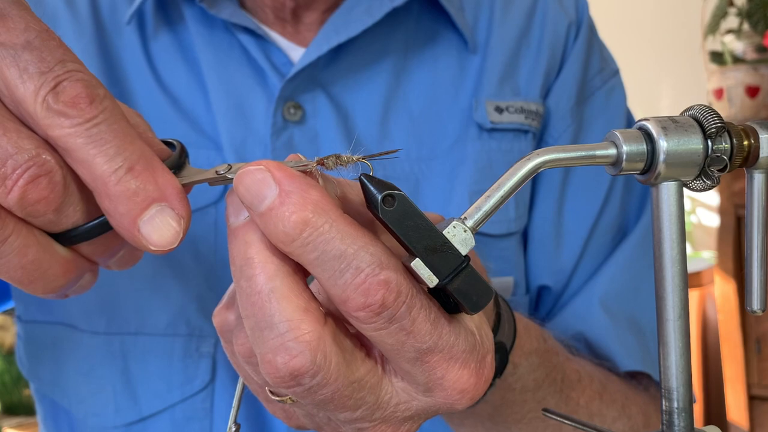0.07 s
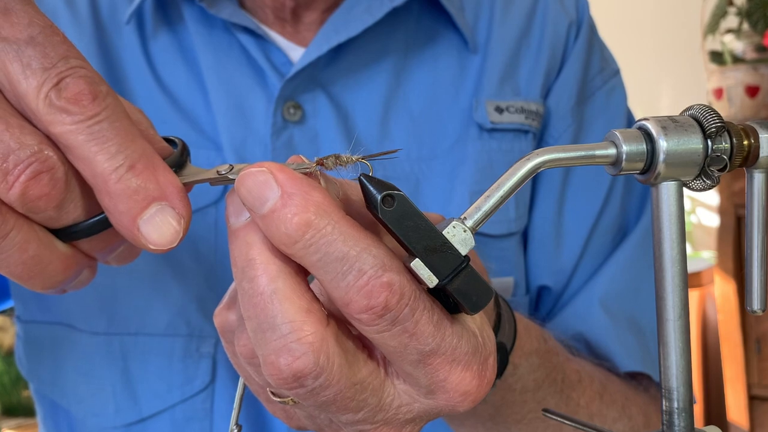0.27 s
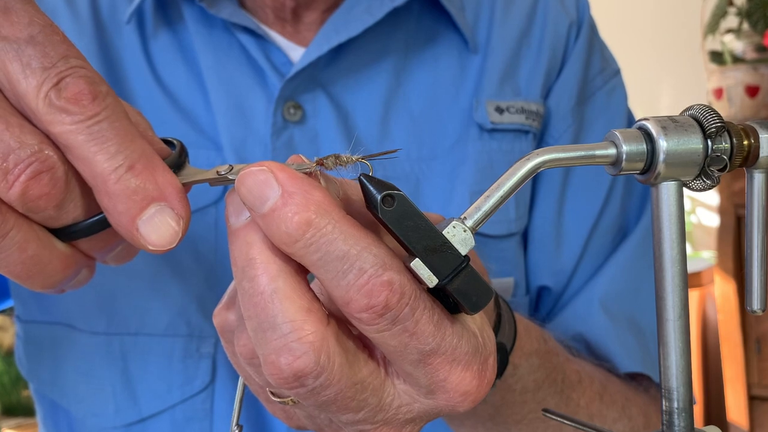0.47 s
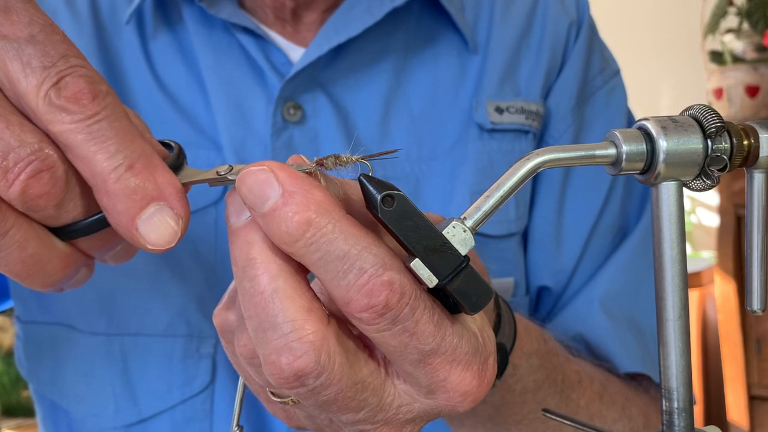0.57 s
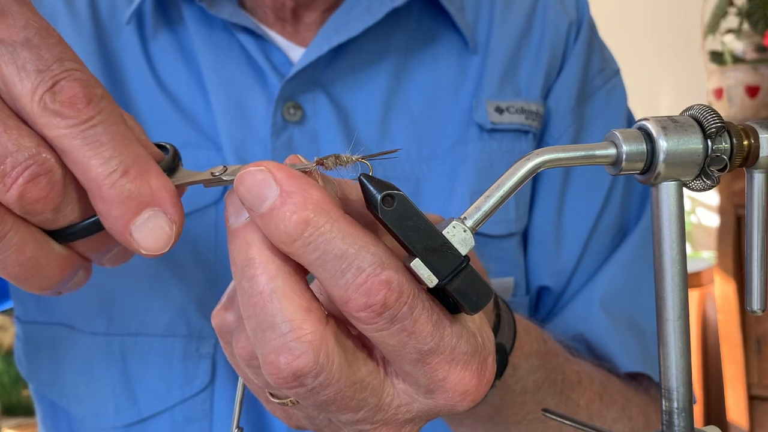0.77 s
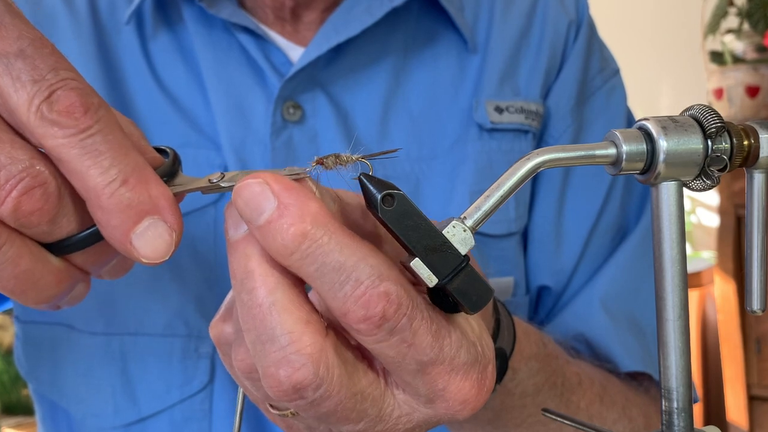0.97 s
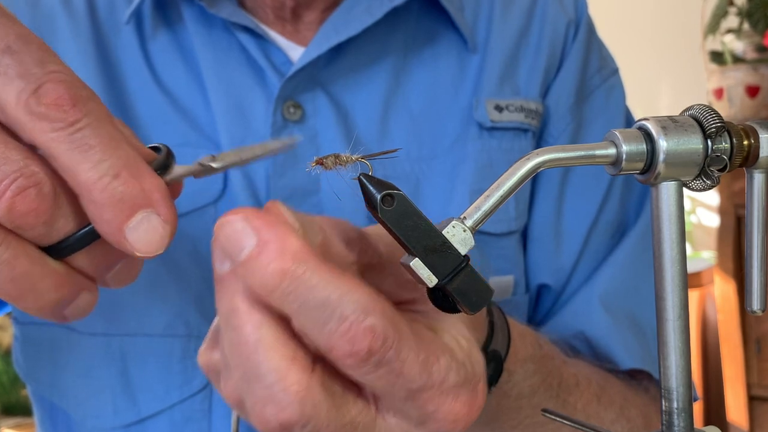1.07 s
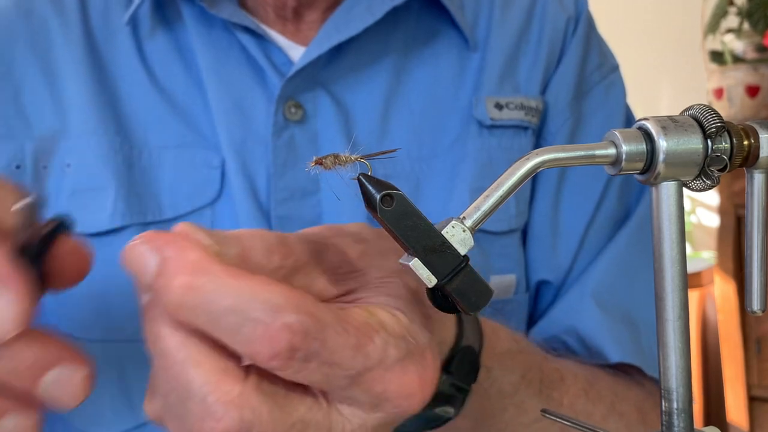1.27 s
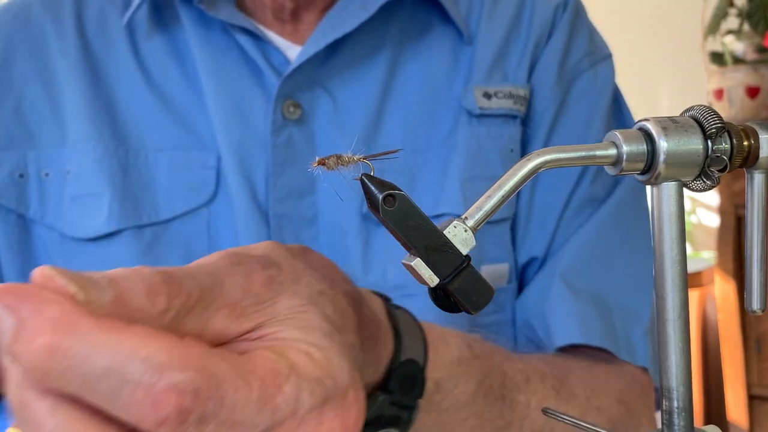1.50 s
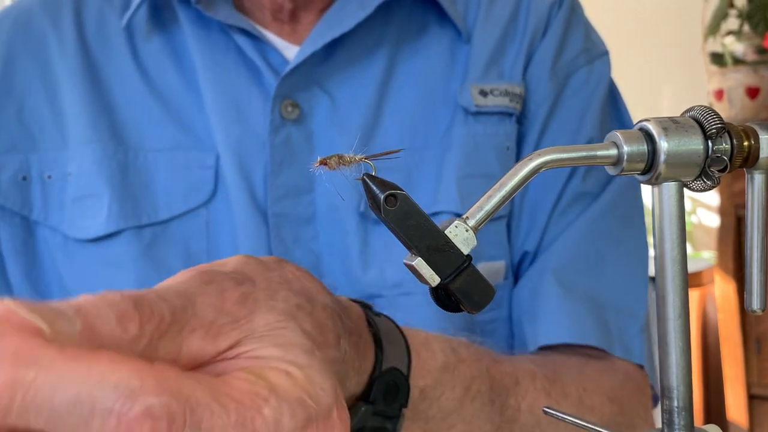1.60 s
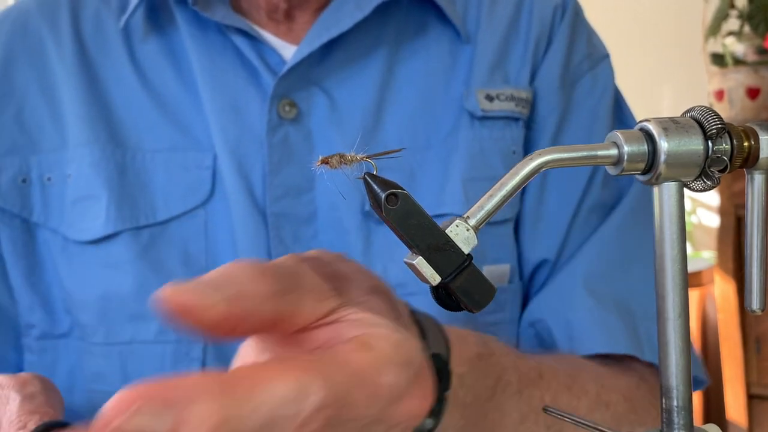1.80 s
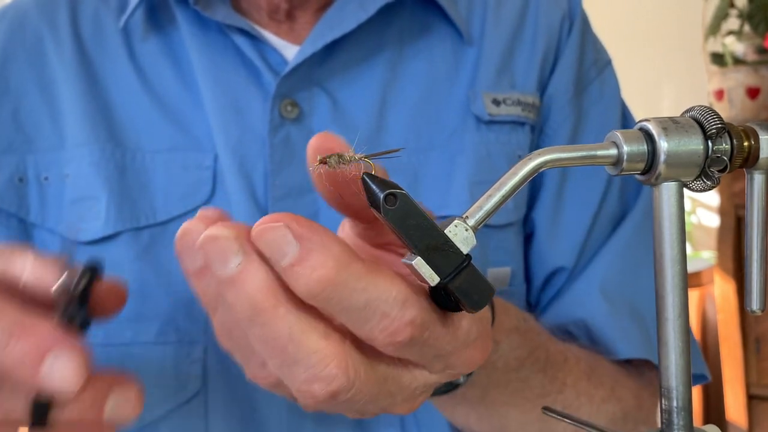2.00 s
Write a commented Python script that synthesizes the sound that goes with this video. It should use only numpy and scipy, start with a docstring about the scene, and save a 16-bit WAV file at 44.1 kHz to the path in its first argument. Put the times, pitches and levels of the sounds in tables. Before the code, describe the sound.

A close scissor snip, a sleeve rustle, then steel scissors knocking onto a wooden desk.

```python
"""Over a low hum, small steel scissors snip a thread close by, then tick once as the blades open.
A sleeve rustles, a hand rubs on cloth and the scissors are put down on a wooden desk: three knocks
with a short slide, each a click of ringing steel over a hollow thump of wood. The loose blades chatter
after the hardest knock. The small room adds a short echo, and holds the electrical hum, a rumble,
two tiny squeaks and a faint swish that repeats."""
import sys
import numpy as np
from scipy import signal
from scipy.fft import rfft, irfft
from scipy.io import wavfile
from scipy.ndimage import uniform_filter1d

SR = 44100
rng = np.random.default_rng(int(sys.argv[2]) if len(sys.argv) > 2 else 0)


def materialize(psi):
    """Save the field psi as 16-bit PCM at rate SR to the path in sys.argv[1].

    A 1-D psi becomes a single channel; in a 2-D psi each row is a channel.
    """
    bounded = np.clip(np.atleast_2d(psi).T, -1, 1)
    quanta = np.round(bounded * 32767).astype(np.int16)
    wavfile.write(sys.argv[1], SR, quanta)


N = 90316
T = np.arange(N) / SR

# Blade clicks: t/s, level/dB, time to fade by 60 dB (t60)/s, tilt toward treble/dB per octave
BLADE_CLICKS = [(.6022, -40.5, 0.0096, -8), (0.6307, -13.5, 0.0099, -1), (0.635, -22.5, 0.013, -2.5),
                (0.7797, -34, 0.017, -6), (.7822, -39, 0.016, -5)]
# Tone of a click, or how strong each pitch is: f/Hz, level/dB
CLICK_TONE = [(400, -45), (1200, -29.5), (2200, -4.5), (4500, -8.5), (8000, -9.5), (10500, -2), (12200, 3),
              (14200, 7), (15500, 5.5), (16500, -30)]
def snips():
    """The blades bite through the thread, click shut and tick open: tiny bursts of noise."""
    out = 0
    for at, db, t60, tilt_db in BLADE_CLICKS:
        burst = rng.standard_normal(N) * fade(t60) * rise(.0002)
        click = colour(burst, CLICK_TONE, tilt_db)
        out = out + amp(db) * place(unit(click), at, lag_ms=.18)
    return out

# Rasps of the edges: t/s, level/dB, t60/s, tilt/dB per octave
EDGE_RASPS = [(.638, -23.5, 0.14, 0), (0.786, -45.5, .17, -1.5)]
# Tone of a rasp: f/Hz, level/dB
RASP_TONE = [(600, -25), (1300, -5.5), (2100, 4.5), (3200, 0), (5500, 0), (8500, -14), (10500, 0.5),
             (13200, -2), (14500, 8.5), (15400, 5), (16200, -28)]
def rasps():
    """The edges rasp on for a moment after closing and opening."""
    return sum(rattle(at, db, t60, RASP_TONE, tilt_db) for at, db, t60, tilt_db in EDGE_RASPS)

# Knocks on the desk: t/s, steel level/dB, boosted f/Hz, boost/dB, crack level/dB,
# crack tilt/dB per octave, tip level/dB, thump level/dB, thump f/Hz, left ear delay/ms
DESK_KNOCKS = [(1.6140, -19.5, 7090, 11.5, -9.5, -0.8, -42, -9, 578, .2),
               (1.7273, 2, 7470, 2.5, -3.5, 4.5, -21.5, -1, 266, .18),
               (1.8237, -15, 10950, 14.5, -5, -1, -55, -9.5, 283, .21)]
# Tone of the sharp crack: f/Hz, level/dB
CRACK_TONE = [(300, -16.5), (900, -8), (1600, -9), (2500, 5.5), (3800, 3.5), (5300, -9), (7200, -1),
              (8500, -13), (10200, 1), (11800, -3), (13300, -8), (14800, -1), (17000, -17)]
# Notes of the closed scissors, cut short by the desk: f/Hz, level/dB, t60/s
STEEL_NOTES = [(2364, -14.5, 0.028), (3515, -6.5, .011), (4003, -6, .009), (4200, -1.5, 0.0081),
               (4840, -0.5, 0.011), (7140, -2, .008), (7740, 2.5, 0.0097), (9500, -2, 0.0026),
               (10600, 2, 0.0076), (11660, 2.5, 0.006), (14500, -0.5, 0.007)]
# Longer notes of the free blade tips: f/Hz, level/dB, t60/s
TIP_NOTES = [(2380, -14.5, .3), (4720, -12, .25), (4830, -4, 0.3), (4980, -4.5, 0.3), (5230, -5.5, 0.35),
             (5340, -7.5, .3), (5900, -8.5, .12)]
def knocks():
    """Each knock cracks, rings the steel a little differently and thumps the desk: (metal, wood)."""
    metal, wood = 0, 0
    for knock in DESK_KNOCKS:
        at, steel_db, boost_hz, boost_db, crack_db, tilt_db, tip_db, thump_db, thump_hz, lag_ms = knock
        boost = lambda hz: amp(boost_db * near(hz, boost_hz, octaves=.19))
        burst = rng.standard_normal(N) * fade(.007) * rise(.0002)
        crack = shape(colour(burst, CRACK_TONE, tilt_db), boost)
        notes = [(hz * (1 + .003 * rng.standard_normal()), db, t60) for hz, db, t60 in STEEL_NOTES]
        steel = ring(notes, boost) * rise(.00087)
        tips = ring(TIP_NOTES)
        hit = amp(steel_db) * unit(steel) + amp(crack_db) * unit(crack) + amp(tip_db) * unit(tips)
        metal = metal + place(hit, at, lag_ms)
        wood = wood + thump(at + .001, thump_db, thump_hz, rise_s=.0054)
    return metal, wood

# Notes of the desk top: f/Hz, level/dB, t60/s
DESK_NOTES = [(105.83, -16, 0.46), (180.36, -21, 0.44), (226.5, -9, 0.054), (259.4, 0, 0.034),
              (317, 3, 0.029), (371, -5.5, 0.028), (558.5, -1.5, 0.022), (802, -6, 0.027),
              (1100, -7.5, 0.023), (1730, -19.5, 0.46)]
def thump(at, db, centre_hz, rise_s):
    """A push makes the desk top ring, favouring its notes near centre_hz."""
    body = ring(DESK_NOTES, lambda hz: near(hz, centre_hz, octaves=.94)) * rise(rise_s)
    left_right_db = np.array([[1], [-1]])
    return amp(db + left_right_db) * place(unit(body), at, lag_ms=-.21)

# The one burst of chatter: t/s, level/dB, t60/s
BLADE_CHATTER = (1.735, -12, .25)
# Its tone: f/Hz, level/dB
CHATTER_TONE = [(1800, -27), (2500, -4.5), (3300, -25), (4500, 1), (5200, 7.5), (5900, 4.5), (6700, -5.5),
                (8000, -14), (9000, -21.5), (10200, 0.5), (11200, 3), (12300, -3), (13500, -18.5),
                (15000, -13), (16300, -36)]
def chatter():
    """The loose blades chatter after the hardest knock."""
    return rattle(*BLADE_CHATTER, CHATTER_TONE, tilt_db=-2.5)

def rattle(at, db, t60, tone, tilt_db):
    """A dying run of tiny steel taps, made from grainy noise."""
    hiss = colour(rng.standard_normal((2, N)), tone, tilt_db)
    run = hiss * fade(t60) * rise(.0019) * amp(-.5 * walk(760))
    delayed = np.pad(unit(run), ((0, 0), (int(at * SR), 0)))[:, :N]
    return amp(db) * np.sqrt(2) * delayed

# Short scrapes: t/s, level/dB, half length/s
SCRAPES = [(1.634, -41.5, 0.014), (1.676, -42.5, 0.01), (1.723, -48, 0.0034), (1.74, -49, 0.024),
           (1.842, -46, .03)]
# Tone of steel on wood: f/Hz, level/dB
SCRAPE_TONE = [(100, 12.5), (350, 16.5), (700, -2), (1500, -10), (3500, -8), (6500, -9.5), (9000, -22.5),
               (15000, -22), (16300, -38.5)]
def slides():
    """The scissors scrape unevenly over the wood as they settle."""
    push = sum(amp(db) * swell(at, half) for at, db, half in SCRAPES)
    return spread(noise(SCRAPE_TONE)) * push * amp(2 * walk(300))

# Bumps of the arm: t/s, level/dB, centre f/Hz
ARM_BUMPS = [(1.184, -23.5, 303), (1.272, -22.5, 150), (1.412, -22.5, 245.5), (1.665, -15.5, 150.8)]
def bumps():
    """The arm bumps the desk softly, so each thump starts gently."""
    return sum(thump(at, db, hz, rise_s=.017) for at, db, hz in ARM_BUMPS)

# How loud the sleeve is: t/s, level/dB
SLEEVE_LEVEL = [(0, -90), (1.08, -80), (1.2, -65), (1.33, -62.5), (1.45, -55), (1.56, -62), (1.85, -62),
                (2.05, -74)]
# Tone of the cloth: f/Hz, level/dB
CLOTH_TONE = [(100, 18.5), (220, 27.5), (500, 14), (900, 5.5), (1600, -9), (2300, -5), (4500, -7),
              (8000, -28), (11000, -19), (16000, -22.5)]
def sleeve():
    """The sleeve rustles as the hands move."""
    return spread(noise(CLOTH_TONE) * amp(curve(SLEEVE_LEVEL) + .69 * walk(40)))

# How loud the hand rubs as it is lowered: t/s, level/dB
RUB_LEVEL = [(0, -99), (1.05, -87), (1.28, -77.5), (1.45, -72.5), (1.6, -75), (1.85, -81), (2.05, -87)]
# Hollow part of the rub: f/Hz, level/dB
RUB_TONE = [(500, -22), (1000, 3.5), (1350, -4.5), (1720, -1), (1950, -16), (3000, -25.5), (16000, -51.5)]
# Hissy part of the rub: f/Hz, level/dB
RUB_HISS_TONE = [(2000, -10), (4000, -8), (7200, 0.5), (8600, -13.5), (10000, 5), (12200, -0.5),
                 (13500, -9), (15000, -0.5), (16300, -17.5)]
def rub():
    """Skin drags over cloth in small catches, with a smooth, fine hiss on top."""
    catches = noise(RUB_TONE) * amp(walk(70))
    hiss = amp(-3.5) * noise(RUB_HISS_TONE)
    return spread(catches + hiss) * amp(curve(RUB_LEVEL))

# Tone of the echo: f/Hz, level/dB
ECHO_TONE = [(80, -1), (200, 3), (500, -9.5), (1100, -4.5), (1800, -11.5), (2500, -9), (5000, -16),
             (8000, -19), (11000, -14.5), (15000, -12), (16300, -24)]
def room(x):
    """The small room sends sound back from all sides; the treble dies first."""
    wash = rng.standard_normal((2, N))
    low = shape(wash, lambda f: 1 / (1 + (f / 7000) ** 2))
    tail = (low * fade(t60=.32) + (wash - low) * fade(t60=.13)) * rise(.0073) ** 2
    response = colour(spread(unit(tail)), ECHO_TONE)
    return signal.fftconvolve(x, response, axes=1)[:, :N]

# Faint squeaks: t/s, level/dB, f/Hz
TINY_SQUEAKS = [(.347, -74.5, 1850), (0.919, -72, 1860)]
def squeaks():
    """Two short tones, roughened by a shaky pitch."""
    shaky_time = np.cumsum(1 + .05 * walk(200)) / SR
    return sum(amp(db) * swell(at, half_s=.0099) * np.sin(2 * np.pi * hz * shaky_time)
               for at, db, hz in TINY_SQUEAKS)

# Tone of the swish: f/Hz, level/dB
SWISH_TONE = [(600, -25), (1200, 9.5), (1600, -4), (3000, -12.5), (5200, -2.5), (8000, -15), (15000, -17.5)]
def swish():
    """Four faint, evenly spaced puffs of noise."""
    first_s, gap_s = .15, .435
    puffs = sum(swell(first_s + k * gap_s, half_s=.026) for k in range(4))
    return spread(noise(SWISH_TONE) * amp(-71) * puffs)

# Notes of the hum: f/Hz, level/dB
HUM_NOTES = [(76, -52.5), (107.7, -61), (178, -67), (250, -73), (350, -72.5), (415, -75), (522, -77.5)]
# Rise and fall added to the lowest note: t/s, level/dB
LOW_NOTE_SWELL = [(0, -9), (.15, 1.5), (.65, -5), (.85, 0.5), (1.35, -3), (1.8, 4), (1.97, 10), (2.05, -1)]
def hum():
    """An electrical hum whose notes each waver a little."""
    t = T + np.array([[.00041], [0]])  # the left ear hears it first
    notes = []
    for hz, db in HUM_NOTES:
        level = np.sqrt(2) * amp(db + 2 * walk(10))
        phase = 2 * np.pi * (hz * t + rng.random()) + .12 * walk(3.7)
        notes.append(level * np.sin(phase))
    return notes[0] * amp(curve(LOW_NOTE_SWELL)) + sum(notes[1:])

# Tone of the quiet room: f/Hz, level/dB
AIR_TONE = [(20, -22), (45, -1.5), (65, 1), (110, 2), (145, -2), (200, -4), (300, -6.5), (420, -8.5),
            (600, -25.5), (1000, -35.5), (2000, -43), (5000, -47.5), (11000, -50.5), (16000, -48)]
def room_air():
    """A flickering rumble under an even hiss."""
    air = amp(-54) * spread(noise(AIR_TONE))
    rumble = shape(air, lambda f: 1 / (1 + (f / 1500) ** 4))
    hiss = air - rumble
    return rumble * amp(2.33 * walk(13.96)) + hiss

# Stereo width, or the sides compared with the middle: f/Hz, level/dB
WIDTH = [(40, -6), (130, -13), (300, -5.5), (700, 2), (2000, -0.5), (16000, 1)]
def spread(pair):
    """Turn two unrelated signals into sound from all around, alike in both ears in the bass."""
    side = colour(pair[1], WIDTH)
    return np.array([pair[0] + side, pair[0] - side]) / np.sqrt(2)

def amp(db):
    """Decibels to gain."""
    return 10 ** (np.asarray(db) / 20)

def unit(x):
    """Scale to an energy of 1."""
    return x / np.sqrt(np.sum(x ** 2))

def curve(points):
    """Join (t/s, level/dB) points with straight lines."""
    return np.interp(T, *np.array(points).T)

def shape(x, gain):
    """Turn each frequency f up or down by gain(f)."""
    return irfft(rfft(x) * gain(np.arange(N // 2 + 1) * SR / N + 1), N)

def colour(x, points, tilt_db=0):
    """Filter by (f/Hz, level/dB) points and a tilt per octave."""
    hz, db = np.array(points, float).T
    tilted_db = db + tilt_db * np.log2(hz / hz[-1])
    return shape(x, lambda f: amp(np.interp(np.log(f), np.log(hz), tilted_db)))

def noise(tone):
    """Noise with this tone and a typical size of 1, unrelated left and right."""
    x = colour(rng.standard_normal((2, N)), tone)
    return x / x.std()

def walk(rate):
    """A smooth random wobble of size near 1, turning `rate` times a second."""
    step = max(int(SR / rate), 1)
    stairs = np.repeat(rng.standard_normal(N // step + 1), step)
    return 1.24 * uniform_filter1d(stairs, step)[:N]

def fade(t60):
    """Die away by 60 dB in t60 seconds."""
    return np.exp(-np.log(1000) * T / t60)

def rise(seconds):
    """A soft start."""
    return 1 - np.exp(-T / seconds)

def swell(at, half_s):
    """A bell-shaped rise and fall."""
    return np.exp(-.5 * ((T - at) / half_s) ** 2)

def near(hz, centre, octaves):
    """1 at the centre frequency, falling off on both sides."""
    return np.exp(-.5 * (np.log2(hz / centre) / octaves) ** 2)

def ring(notes, weight=lambda hz: 1):
    """The notes of a struck object, dying away."""
    return sum(amp(db) * weight(hz) * np.sin(2 * np.pi * hz * T) * fade(t60) for hz, db, t60 in notes)

def place(x, at, lag_ms):
    """Start a sound at a time; the left ear hears it lag_ms later (earlier if negative)."""
    return np.array([np.pad(x, (int(max(s, 0) * SR), 0))[:N] for s in (at + lag_ms / 1000, at)])

def scene():
    """Scissors and desk with their echo, over the quiet sounds of hands and room."""
    cut = snips() + rasps()
    metal, wood = knocks()
    metal = metal + slides() + chatter()
    wood = wood + bumps()
    echo = room(amp(-10) * cut + amp(-3) * metal + amp(-1) * wood)
    return cut + metal + wood + echo + sleeve() + swish() + squeaks() + rub() + hum() + room_air()

def record(dry):
    """Cut the highest treble, above 16500 Hz."""
    return signal.sosfilt(signal.ellip(8, .2, 80, 16500, fs=SR, output="sos"), dry)

dry = scene()
out = record(dry)
materialize(out)
```